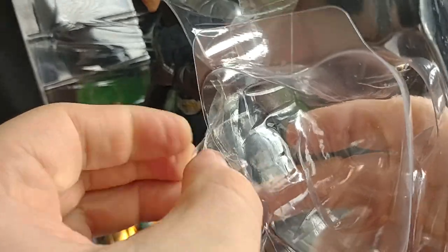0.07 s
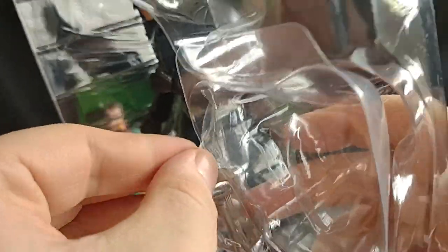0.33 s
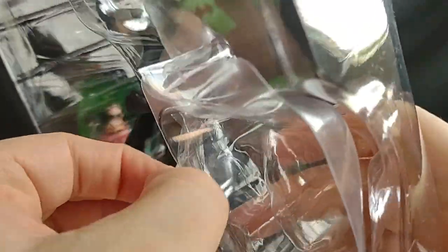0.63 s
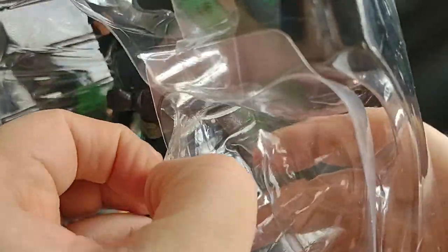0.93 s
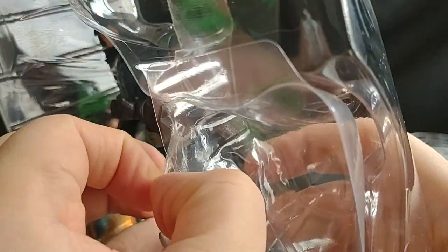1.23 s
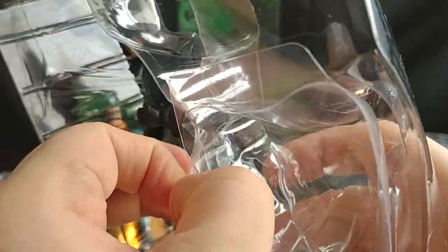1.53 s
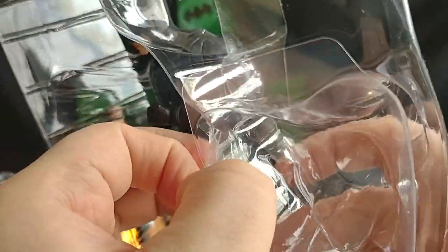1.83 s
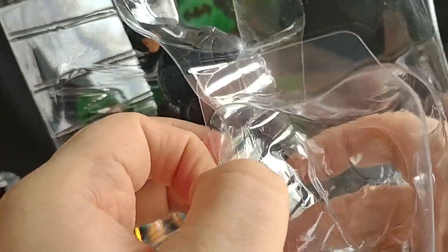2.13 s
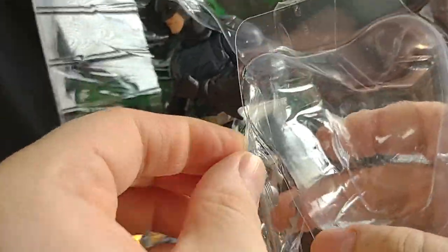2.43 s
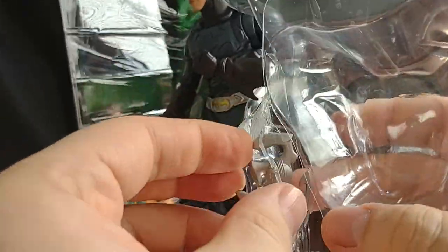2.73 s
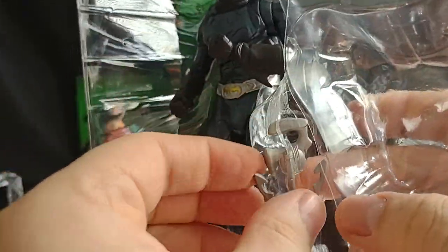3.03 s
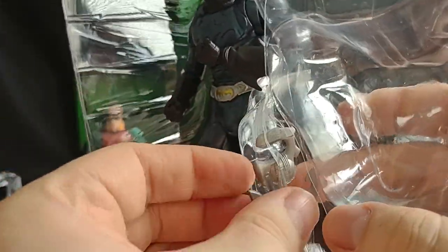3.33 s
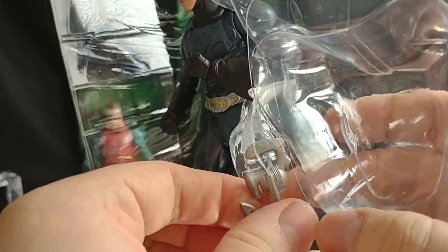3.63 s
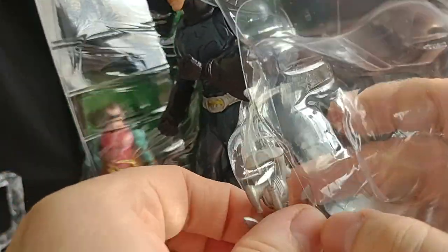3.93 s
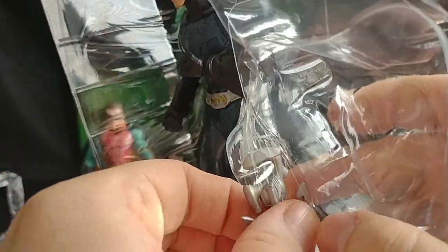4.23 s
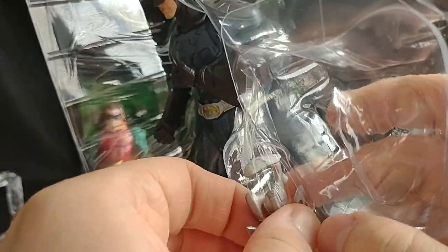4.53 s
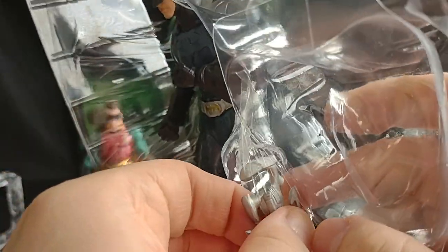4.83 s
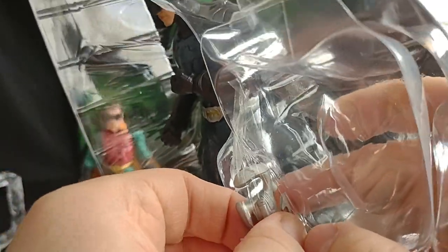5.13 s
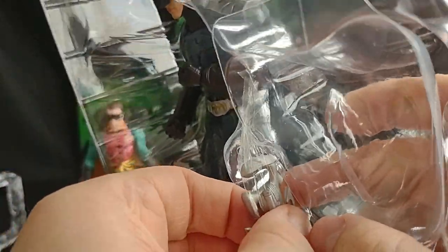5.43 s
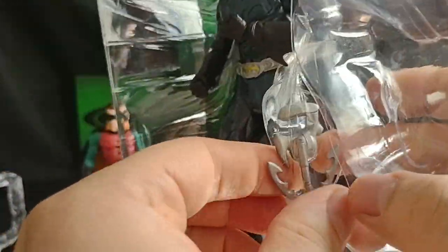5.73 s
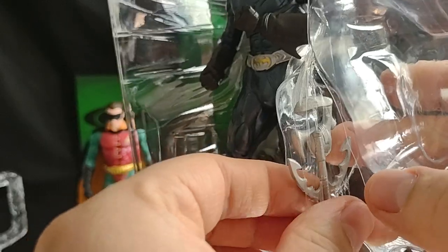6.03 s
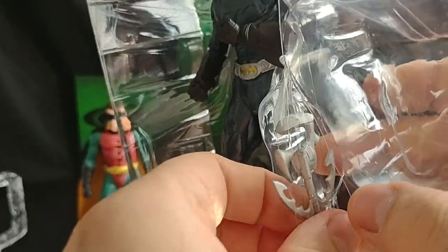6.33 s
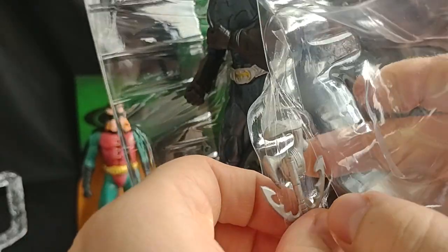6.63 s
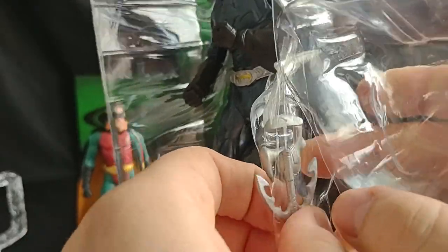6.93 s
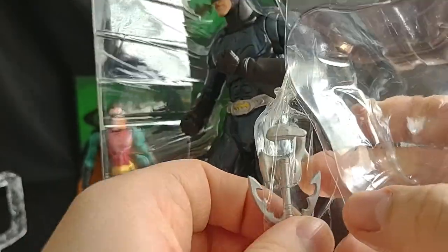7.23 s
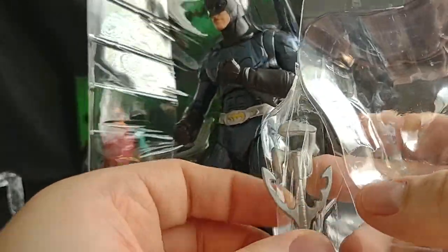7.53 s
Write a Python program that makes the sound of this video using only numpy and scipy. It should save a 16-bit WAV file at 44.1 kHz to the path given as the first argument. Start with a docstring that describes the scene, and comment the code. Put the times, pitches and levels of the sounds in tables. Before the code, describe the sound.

A thin plastic tray ticks and crackles unevenly as hands bend it to work small toy parts loose. Its walls pop sharply twice, with a dull rasp of parts rubbing, then pop again before a faint, grainy sliding hiss. Quicker clicks build to one more loud snap with a hollow thump. The sound is close and fairly dry, in a quiet room with a barely audible low hum.

```python
"""Fingers flex a thin plastic packaging tray to free small toy parts, close up in a small, quiet room.
It opens on light ticks as the walls buckle; around 2 s parts rub in their pockets and two hard snaps
throw the tray with a hollow knock. Another lands at 4 s, then film slides over film amid fine crackle.
From 6 s the ticks crowd together, up to a last big snap and the heaviest knock at 7.2 s,
while the faint two-tone hum that lies under the whole scene swells."""
import sys
import numpy as np
from scipy import signal
from scipy.fft import rfft, irfft, next_fast_len
from scipy.io import wavfile
from scipy.ndimage import map_coordinates

SR = 44100
rng = np.random.default_rng(int(sys.argv[2]) if len(sys.argv) > 2 else 0)


def digitize_waveform(pressure):
    """Quantize a signal to 16-bit integers and store it at the path in sys.argv[1].

    Rows of a 2-D input are taken as channels; values are limited to [-1, 1].
    """
    field = np.atleast_2d(pressure).T
    bounded = np.clip(field, -1, 1)
    quanta = np.round(bounded * 32767).astype(np.int16)
    wavfile.write(sys.argv[1], SR, quanta)


N = 338684

# wall snaps: t/s, f/Hz of the buckling spot, level/dB, brightness/(dB per octave)
SNAP_CUES = [(0.079, 7340, -53, -0.5), (0.132, 740.0, -53.5, -5.5), (0.1596, 1920.0, -45.5, -3.5),
             (0.315, 7030.0, -56.5, -6), (0.4572, 2200, -57.0, -5), (0.632, 647, -64, -4),
             (0.7557, 2280.0, -51.0, 1.5), (0.7935, 3690.0, -53.5, -6.5), (0.831, 5660, -38.5, -0.5),
             (1.107, 1110, -60, -9), (1.161, 1930, -58.5, 1.5), (1.4929, 605.0, -53, -3),
             (1.5118, 7100, -41, 1), (1.8072, 1670, -39, -11), (1.8312, 1650, -43.5, -11),
             (1.8654, 1980.0, -40.5, 1.5), (1.9031, 7730, -14.5, -3), (1.971, 7390.0, -34.5, -7),
             (2.032, 2140, -46.5, -3), (2.0904, 653.0, -37.5, -9), (2.103, 2250, -26.5, -0.5),
             (2.186, 2270, -48.5, 2), (2.2511, 5370, -38, 0), (2.2791, 1510, -13.5, 3),
             (2.41, 6650.0, -45.5, 6.5), (2.419, 750.0, -40.5, -4.0), (2.561, 1980, -50.5, -5),
             (2.6547, 5400, -43, 1.5), (2.669, 1800.0, -49.5, -9.5), (2.7311, 5350, -45.0, 0.5),
             (2.738, 1750, -40, -2), (2.758, 2320, -42.5, 1), (2.8292, 680, -50.5, -1),
             (2.908, 1690, -36.5, -0.5), (3.0977, 2880, -54.5, -4), (3.155, 4320.0, -56.5, -3),
             (3.1964, 7150.0, -47, 2.0), (3.2309, 1810.0, -55.5, 1.5), (3.2956, 5200, -52, 0.5),
             (3.3622, 756, -46.5, -14), (3.4537, 3540, -57.5, -2.5), (3.462, 1860, -50, -2.5),
             (3.5077, 4200.0, -46.5, 6), (3.6675, 1114, -45, -4), (3.7095, 5200, -52.5, 1.5),
             (3.8616, 1163.0, -54.5, -0.5), (3.8956, 3700.0, -48.0, 0.5), (3.9363, 7100, -49.5, 0.5),
             (3.998, 5030, -40, 5.5), (4.0319, 4100, -19, 0.5), (4.082, 2360.0, -31, 4.5),
             (4.3394, 650, -47, -5.5), (4.394, 3440.0, -52, -5.0), (4.4889, 2800.0, -34.0, 0.5),
             (4.5477, 1320, -31.0, -1), (4.736, 3660, -53.5, -4.5), (4.805, 3940.0, -43.5, 4.5),
             (4.9426, 6090.0, -45.5, 0), (4.9654, 4000, -28.0, -0.5), (5.029, 6090.0, -32.5, 9),
             (5.0715, 7630, -33.5, 3), (5.45, 830, -37.5, 0), (5.6253, 3330, -47.5, -2.5),
             (5.6649, 1330, -35, -6), (5.6784, 984, -28.5, -0.5), (5.6815, 3690.0, -27, 2.5),
             (5.8905, 5360.0, -53.5, 0.5), (6.0443, 5490, -42.5, 3.5), (6.0903, 5500, -48.5, 9),
             (6.127, 5480, -52, 3.5), (6.1765, 5740, -41, 4.0), (6.1833, 6040, -41, 5.5),
             (6.2886, 3500, -52.5, 3), (6.3294, 6100, -39.5, 4.0), (6.3491, 5820.0, -56.5, 2.5),
             (6.546, 5600, -46, 12.5), (6.5674, 3840, -42.5, 7.5), (6.5978, 1950, -47, -6),
             (6.7561, 1400, -32.5, 0), (6.868, 1280, -41, -1.5), (6.8761, 5370, -25.5, -0.5),
             (6.907, 6060, -36.5, -2.5), (6.9183, 4480, -29.5, 1), (6.943, 5700, -40, 1),
             (7.0698, 2870, -41, 1.5), (7.082, 3400, -41, 2), (7.1258, 4600.0, -33.5, 3.5),
             (7.1713, 4670, -33, 4), (7.2093, 1780, -16.5, -0.5), (7.4066, 6870, -41.0, 3.5),
             (7.4556, 6330.0, -39, 2.0), (7.4904, 7200, -34, 3.0), (7.5437, 2190.0, -42.5, -4),
             (7.601, 5450, -43.5, 2.5), (7.6231, 6700, -34.5, 6)]
# ringing zones (broad walls, pocket sides, ribs, sharp creases): low f/Hz, high f/Hz, t60/s
ZONES = [(605, 1250, 0.039), (1247, 2700, 0.033), (2760, 5300, 0.026), (5234, 8100, 0.0094)]
# ticks favour the pocket sides and the ribs: gain/dB for each zone
TICK_EQ = [0.5, 2.5, 4, -1]
# ring of the whole tray: f/Hz, level/dB, t60/s
TRAY_MODES = [(543, -22, 0.14), (620.3, 0.5, 0.06), (765, 1, 0.09), (868.5, -6.5, 0.12),
              (1023, -2.5, 0.013), (1120, -4.5, 0.034), (1380, -11, .06), (1743, 3.5, 0.041),
              (1835, 5, 0.044), (2310, -16.5, 0.15), (2807, 5, 0.017), (3595, 10.5, 0.0081),
              (3680, 4.5, 0.03), (4200, 8.5, 0.012), (4860, 5, 0.016), (5643, 0, 0.044), (6150, 10, 0.015),
              (6810, 5.5, 0.021), (7330, 6, 0.021), (7620, -8.5, 0.034)]
# a small tray sends little bass into the room: f/Hz, gain/dB
RADIATION_EQ = [(100, -32.0), (470, -10.5), (590, -1.0), (7800, -2.5), (9000, -24.0)]
# the tray jumps in the hand: t/s, level/dB
KNOCK_CUES = [(1.905, -40.5), (2.102, -59.5), (2.281, -50.5), (3.93, -64), (3.996, -62), (4.033, -47.5),
              (4.34, -61.5), (4.55, -73), (4.967, -59), (5.069, -67.5), (5.676, -60), (6.876, -47),
              (6.92, -58), (7.205, -33.5)]
# low ring of the hollow shell: f/Hz, level/dB, t60/s
HOLLOW_MODES = [(148.5, -12, 0.15), (204, 6.5, 0.036), (326.4, -6, 0.047), (361, -7, 0.12),
                (397, -2.5, 0.048)]
# a part rubs in its pocket: start t/s, length/s, level/dB before the tray's EQ
RUB_CUES = [(0, 0.039, -56.5), (1.49, 0.26, -50), (2.15, 0.077, -40.5), (2.33, 0.069, -44), (2.9, .04, -56),
            (3.63, 0.089, -57), (4.28, 0.063, -65), (6.82, 0.038, -57), (7.44, .18, -61)]
# dull tone of the rubbing: f/Hz, gain/dB
RUB_EQ = [(200, -40), (350, -11.5), (430, -1.5), (520, -8.5), (620, 2.5), (900, -7.5), (1150, -0.5),
          (1600, -10), (2300, -5), (3100, -24), (4000, -23), (7500, -27)]
# film slides over film: start t/s, length/s, level/dB before the tray's EQ
SLIDE_CUES = [(1.25, .25, -58.5), (1.54, .13, -66), (4.3, 0.79, -62), (5.08, .14, -56.5),
              (6.42, 0.52, -66.5), (7.49, 0.036, -52)]
# bright tone of the sliding: f/Hz, gain/dB
SLIDE_EQ = [(1500, -50.5), (3000, -6.5), (5200, -12.5), (6400, -4), (7400, 5), (8200, -16)]
# crackle of the held tray, louder the firmer the grip: t/s, level/dB before the tray's EQ
GRIP_FADER = [(0, -58.5), (.55, -75.5), (1.2, -65), (3.8, -70.5), (4.4, -60), (5.1, -58.5), (5.4, -69.5),
              (6.1, -61), (6.45, -75.5), (6.9, -57), (7.65, -72)]
# tone of the crackle: f/Hz, gain/dB
CRACKLE_EQ = [(200, -28), (450, -10), (650, 5.5), (1800, -7), (2700, -6.5), (3800, -5), (8000, -15.5)]
# a fingertip scrapes along a wall: middle t/s, spread/s, f/Hz, level/dB
SCRAPE_CUES = [(.1, 0.22, 1240, -66), (2.18, 0.013, 616, -41.5), (2.225, 0.013, 600, -41.5),
               (3.1, 0.3, 1740, -69), (4.024, 0.018, 4830, -46.5), (4.69, 0.008, 1330, -58.5),
               (4.865, 0.0053, 970, -63), (5.325, 0.016, 6050, -63), (6.82, 0.06, 1690, -62),
               (7.17, 0.024, 4800, -45)]
# the hands shift their grip with a soft rumble: middle t/s, spread/s, f/Hz, level/dB
REGRIP_CUES = [(2.33, 0.056, 142.4, -59.5), (3.69, 0.069, 112, -59.5), (4.02, 0.044, 118.2, -66),
               (5.08, 0.04, 125, -65), (6.89, 0.063, 106, -66)]
# decay of the room: f/Hz, t60/s
ROOM_DECAY = [(150, 0.33), (400, 0.24), (1000, 0.28), (2800, 0.23), (7500, 0.27)]
# hum tones: f/Hz, opening level/dB, swell level/dB
HUM_TONES = [(145.4, -79, -68), (222, -74, -68)]
# tone of the room air: f/Hz, gain/dB
AIR_EQ = [(20, -7.5), (60, 0.5), (110, 1.5), (220, 1), (350, -2), (700, -11), (1500, -8), (4000, -26),
          (8000, -18.5)]
# high cut on the mix: f/Hz, gain/dB
MASTER_EQ = [(7700, 0), (8000, -4), (8300, -12), (8550, -30), (8900, -41), (11000, -49), (16000, -62),
             (17000, -120)]

TICK_DB = -55.5  # a buckle this weak is a tick: it no longer moves the whole wall
FOCUS_DB, FOCUS_WIDTH = 6, 0.45  # lift of the zone that buckles; its reach in log frequency
SEND_DB, SEND_SLOPE = -7.5, 0.024  # reverb send of a full-scale snap; weaker ones are drier (dB/dB)
CRACKLE_DB, CRACKLE_SLOPE = -56.5, 0.25  # crackle stirred by a full-scale snap; dB per dB of snap
RELAX_S = 0.082  # the wall settles after a snap
HUM_FADE_DB_PER_S, HUM_SWELL_S, HUM_SPREAD_S = 4, 7.01, 0.69  # slow fade; swell's middle and spread


def snaps():
    """The walls pop in and out under the fingers, and the room answers."""
    track = np.zeros(N)
    for s, pitch, db, tilt_db in SNAP_CUES:
        levels = zone_levels(pitch, db, tilt_db)
        direct = buckle(pitch, levels)
        onset = s - 0.0004
        add(track, onset, direct)
        add(track, onset - rng.uniform(0.0021, 0.0052), amp(-21) * direct)  # the crease gives, then flips
        send = amp(SEND_DB + SEND_SLOPE * db) * np.linalg.norm(direct)
        add(track, s, send * snap_reverb(pitch, levels))
    return low_cut(track, 330)  # thin walls radiate no deep bass


def buckle(pitch, levels, spot_db=11, tray_db=1.5, lag_s=0.00077, count=18):
    """One buckle: short local modes, strongest near the spot's pitch, and the ring of the whole tray."""
    sound = np.zeros(SR // 14)
    t = np.arange(len(sound)) / SR
    flip = 1 + 0.25 * np.exp(-(t / 0.0034) ** 2)  # the wall radiates most while it flips over
    decay_scale = amp(rng.standard_normal())  # the grip changes
    mode_zones = np.searchsorted([zone[0] for zone in ZONES[1:]], [mode[0] for mode in TRAY_MODES])
    for k, ((lo, hi, t60), db) in enumerate(zip(ZONES, levels)):
        local_hz = lo + (hi - lo) * (np.arange(count) + rng.random(count)) / count
        local = [(hz, spot_db * bell(hz, pitch, width=0.11), t60 * decay_scale) for hz in local_hz]
        whole = [(hz, level + tray_db, decay)
                 for (hz, level, decay), zone in zip(TRAY_MODES, mode_zones) if zone == k]
        hit = flip * ring(local + whole, len(sound), rise_s=0.0005)
        slowness = np.sqrt(ZONES[0][0] / lo)  # bending waves: the treble arrives first
        add(sound, lag_s * slowness, set_attack_level(hit, db))
    return sound


def zone_levels(pitch, db, tilt_db):
    """Share a snap's level among the four zones: tilted by its brightness, lifted where it buckles."""
    centres = np.array([np.sqrt(lo * hi) for lo, hi, _ in ZONES])
    weakness = np.clip(db / TICK_DB, 0, 1)
    tilt = tilt_db * np.log2(centres / centres[0])
    focus = FOCUS_DB * bell(centres, pitch, FOCUS_WIDTH)
    shape = tilt + focus + weakness * np.array(TICK_EQ)
    return db + shape - 20 * np.log10(np.linalg.norm(amp(shape)))


def snap_reverb(pitch, levels, spot_db=2.0, tray_db=3.5):
    """The room hears all sides of the tray at once, so a snap's tail has a smooth colour."""
    tail = room_tail()
    size = next_fast_len(len(tail))
    hz = np.fft.rfftfreq(size, 1 / SR)
    density = [(np.sqrt(lo * hi), db - 10 * np.log10(hi - lo)) for (lo, hi, _), db in zip(ZONES, levels)]
    eq_db = along(density, hz) + along(RADIATION_EQ, hz)
    eq_db += spot_db * bell(hz, pitch, width=0.13) + tray_db * tray_peaks(hz)
    tail = irfft(rfft(tail, size) * amp(eq_db), size)
    return tail / np.linalg.norm(tail)


def knocks():
    """Big buckles throw the whole hollow tray, which adds a low thump."""
    track = np.zeros(N)
    for s, db in KNOCK_CUES:
        thump = set_attack_level(ring(HOLLOW_MODES, SR // 5, rise_s=0.0055), db)
        add(track, s, in_room(thump, send_db=-2))
    return low_cut(track, 110)


def handling():
    """Plastic friction and crackle coloured by the tray, plus skin friction, all in the room."""
    plastic = filtered(rubbing() + sliding() + crackle(), lambda hz: amp(4.4 * tray_peaks(hz) - 3))
    scrapes = skin_strokes(SCRAPE_CUES, width=0.13, rate=1700)
    rumble = skin_strokes(REGRIP_CUES, width=0.53, rate=1200)
    return in_room(plastic + scrapes + rumble, send_db=-7)[:N]


def rubbing():
    """Parts stick and slip in their pockets: a dense, dull rasp."""
    gain = push_envelope(RUB_CUES, rest_db=-83, build_db=4.5, attack_s=0.02, release_s=0.023)
    return coloured(slips(rate=700, spread_db=4, decay_s=0.006), RUB_EQ) * gain


def sliding():
    """Film catches on film: a bright, grainy hiss."""
    gain = push_envelope(SLIDE_CUES, rest_db=-81, build_db=5, attack_s=0.025, release_s=0.035)
    return coloured(slips(rate=150, spread_db=3, decay_s=0.0025), SLIDE_EQ) * gain


def push_envelope(cues, rest_db, build_db, attack_s, release_s):
    """Gain of a contact that starts to slip, grows while the finger pushes, and stops."""
    t = np.arange(N) / SR
    power = amp(rest_db) ** 2
    for s, length, db in cues:
        early, late = np.maximum(s - t, 0), np.maximum(t - s - length, 0)
        edges = np.exp(-early / attack_s - late / release_s)
        to_go = np.clip((s + length - t) / length, 0, 1)
        power = power + (amp(db - build_db * to_go) * edges) ** 2
    return np.sqrt(power)


def crackle():
    """Tiny creases give way on their own, each ticking in one of four bands from low to high."""
    creases = np.zeros(N)
    for pitch in (850, 1900, 3800, 7000):
        ticks = slips(rate=29, spread_db=8, decay_s=0.004)
        creases += filtered(ticks, lambda hz: bell(hz, pitch, width=0.92))
    return strain_envelope() * coloured(creases, CRACKLE_EQ)


def strain_envelope():
    """Gain of the crackle: it follows the grip, and each snap stirs up more that dies away."""
    kicks = np.zeros(N)
    for s, _, db, _ in SNAP_CUES:
        add(kicks, s, [amp(CRACKLE_DB + CRACKLE_SLOPE * db) ** 2])
    settling = signal.lfilter([1], [1, -np.exp(-2 / (RELAX_S * SR))], kicks)
    grip_db = np.interp(np.arange(N) / SR, *np.transpose(GRIP_FADER))
    return np.sqrt(amp(grip_db) ** 2 + settling)


def skin_strokes(cues, width, rate):
    """Skin drags on plastic in brief swells, each around one pitch."""
    track = np.zeros(N)
    grain = slips(rate, spread_db=-1, decay_s=0.0009)
    for s, spread, pitch, db in cues:
        size = next_fast_len(int(5 * spread * SR))
        t = (np.arange(size) - size / 2) / SR
        piece = np.roll(grain, rng.integers(N))[:size]
        band = bell(np.fft.rfftfreq(size, 1 / SR), pitch, width)
        voiced = unit(irfft(rfft(piece) * band, size))
        swell = amp(db) * np.exp(-(t / spread) ** 2) * voiced
        add(track, s + t[0], swell[s + t >= 0])
    return track


def in_room(x, send_db):
    """The direct sound plus the room's tail."""
    response = amp(send_db) * room_tail()
    response[0] += 1
    return signal.fftconvolve(x, response)


def room_tail():
    """A fresh diffuse tail of energy 1: noise that blooms, then dies at each band's own rate."""
    hz, t, noise = signal.stft(rng.standard_normal(SR // 3), SR, nperseg=256)
    decay = amp(-60 * t / along(ROOM_DECAY, hz)[:, None])
    tail = signal.istft(noise * decay, SR, nperseg=256)[1]
    tail *= 1 - np.exp(-(np.arange(len(tail)) / SR / 0.0069) ** 2)
    return tail / np.linalg.norm(tail)


def hum():
    """Two faint, wavering tones that sink slowly and swell once near the end."""
    t = np.arange(N) / SR
    swell = np.exp(-((t - HUM_SWELL_S) / HUM_SPREAD_S) ** 2)
    track = np.zeros(N)
    for hz, opening_db, swell_db in HUM_TONES:
        gain = amp(opening_db - HUM_FADE_DB_PER_S * t) + amp(swell_db) * swell
        phase = 2 * np.pi * np.cumsum(hz * (1 + 0.005 * wobble(2.9))) / SR
        flutter = amp(1.2 * wobble(15))
        track += gain * flutter * np.sqrt(2) * np.sin(phase)
    return track


def room_air():
    """A steady bed of soft, dark noise."""
    return amp(-68) * coloured(rng.standard_normal(N), AIR_EQ)


def ring(modes, length, rise_s):
    """Damped modes struck at new strengths and phases."""
    hz, db, t60 = np.transpose(modes)[:, :, None]
    t = np.arange(length) / SR
    strength = amp(db + 2 * rng.standard_normal(hz.shape))
    start = strength * np.exp(2j * np.pi * rng.random(hz.shape))
    step = np.exp((2j * np.pi * hz - np.log(1000) / t60) / SR)  # turn and fade per sample
    waves = start * np.cumprod(np.broadcast_to(step, (len(modes), length)), axis=1)
    return waves.imag.sum(0) * (1 - np.exp(-(t / rise_s) ** 2))


def slips(rate, spread_db, decay_s):
    """Tiny stick-slip bursts of uneven size at random times, about rate a second."""
    triggers = rng.random(N) < rate / SR
    sizes = amp(spread_db * np.minimum(rng.standard_normal(N), 2))
    envelope = signal.lfilter([1], [1, -np.exp(-1 / (decay_s * SR))], triggers * sizes)
    return envelope * rng.standard_normal(N)


def tray_peaks(hz):
    """EQ bells of height 1 at the tray's modes."""
    grid = np.geomspace(400, 9000, 600)
    mode_hz = np.transpose(TRAY_MODES)[0][:, None]
    return np.interp(hz, grid, bell(grid, mode_hz, width=0.025).sum(0))


def bell(hz, centre, width):
    """A bell on the log-frequency axis."""
    return np.exp(-(np.log((hz + 1) / centre) / width) ** 2)


def along(points, hz):
    """Read a curve of (f/Hz, value) points on a log axis."""
    f, values = np.transpose(points)
    return np.interp(np.log(hz + 1), np.log(f + 1), values)


def filtered(x, response):
    """EQ x with a gain given as a function of frequency."""
    size = next_fast_len(N + SR // 2)
    return irfft(rfft(x, size) * response(np.fft.rfftfreq(size, 1 / SR)), size)[:N]


def coloured(x, eq):
    """x through an EQ curve, at rms 1."""
    return unit(filtered(x, lambda hz: amp(along(eq, hz))))


def low_cut(x, hz):
    """Roll off the bass at 12 dB per octave."""
    return signal.sosfilt(signal.butter(2, hz, "high", fs=SR, output="sos"), x)


def wobble(rate):
    """A smooth random curve, rate knots a second."""
    knots = rng.standard_normal(int(N * rate / SR) + 4)
    return map_coordinates(knots, [np.arange(N) * rate / SR])


def set_attack_level(x, db):
    """Scale a hit so that its first 10 ms have this rms level."""
    return amp(db) * x / np.sqrt(np.mean(x[:SR // 100] ** 2))


def amp(db):
    """Decibels to gain."""
    return 10 ** (np.asarray(db) / 20)


def unit(x):
    """Scale to rms 1."""
    return x / np.sqrt(np.mean(x ** 2) + 1e-20)


def add(track, s, sound):
    """Mix a sound into the track at time s."""
    start = max(0, round(s * SR))
    part = track[start:start + len(sound)]
    part += sound[:len(part)]


def scene():
    """The mono mix: the tray up front, hum and air behind."""
    return (snaps() + knocks() + handling() + hum() + room_air())[None]


def record(dry):
    """A steep high cut from about 8 kHz on the whole mix."""
    return filtered(dry[0], lambda hz: amp(along(MASTER_EQ, hz)))[None]


dry = scene()
out = record(dry)
digitize_waveform(out)
```